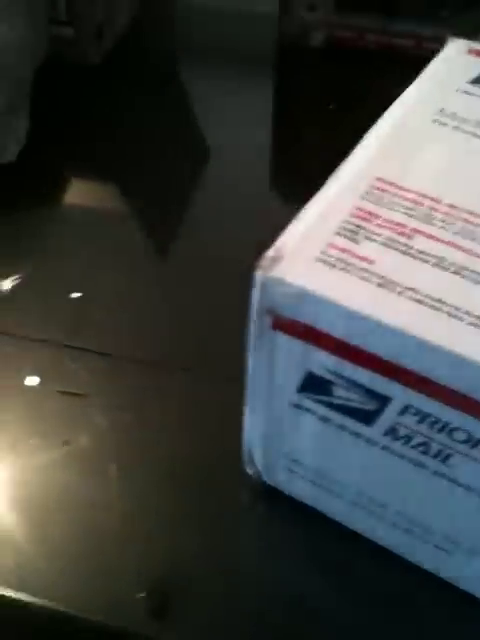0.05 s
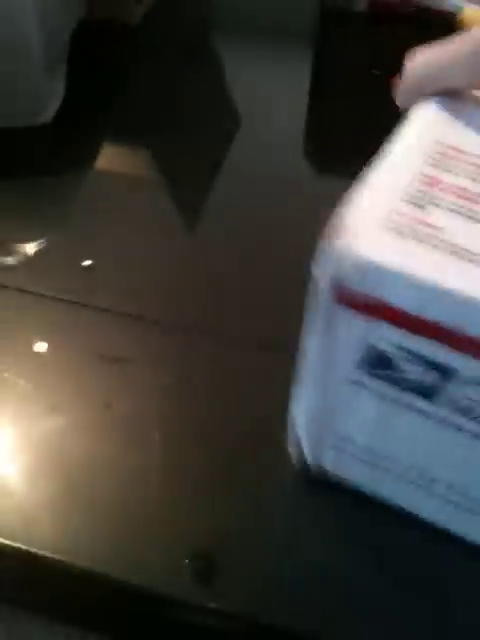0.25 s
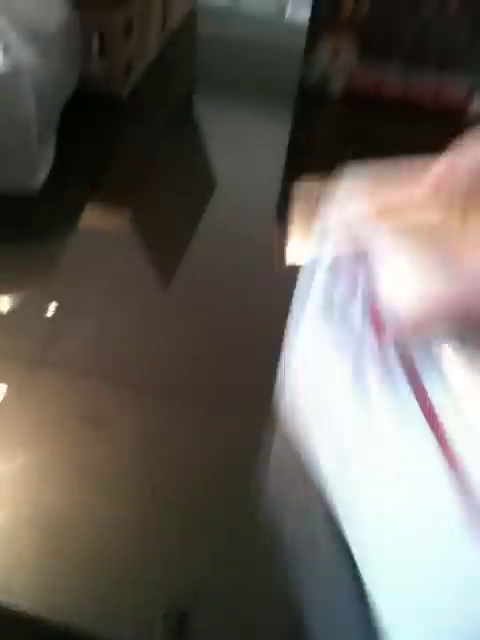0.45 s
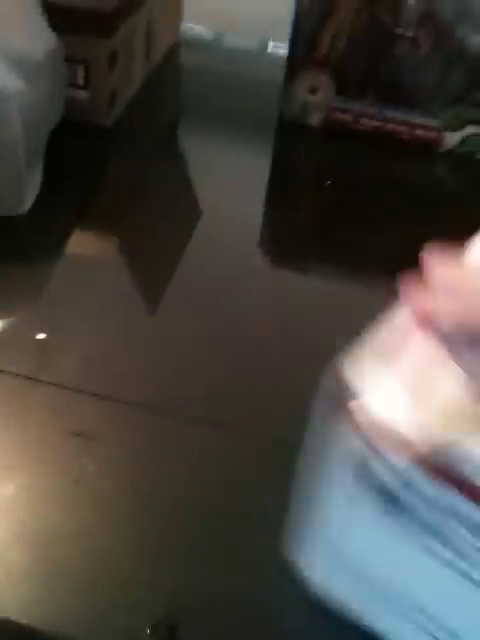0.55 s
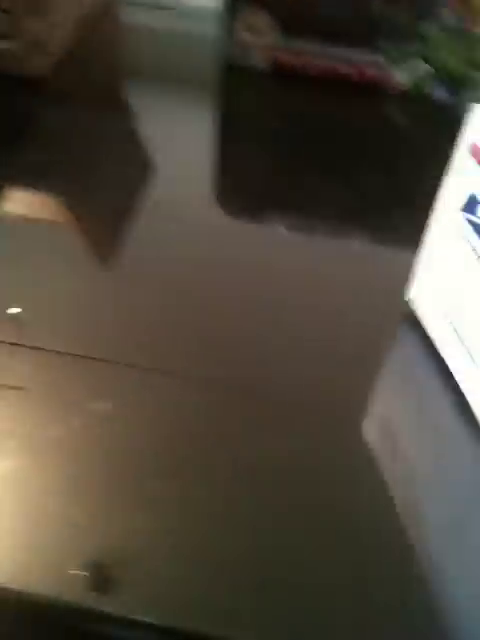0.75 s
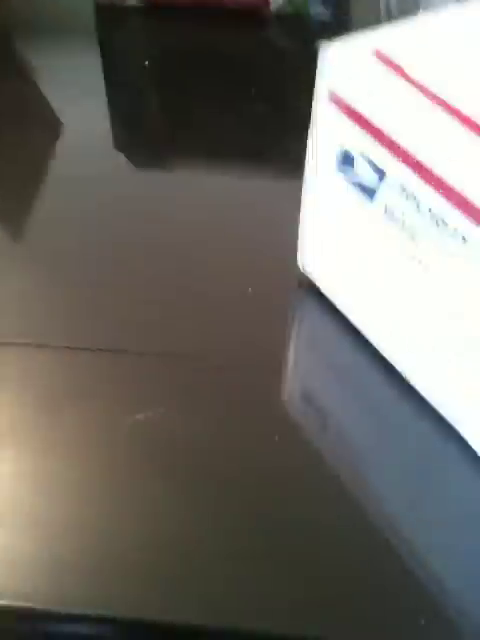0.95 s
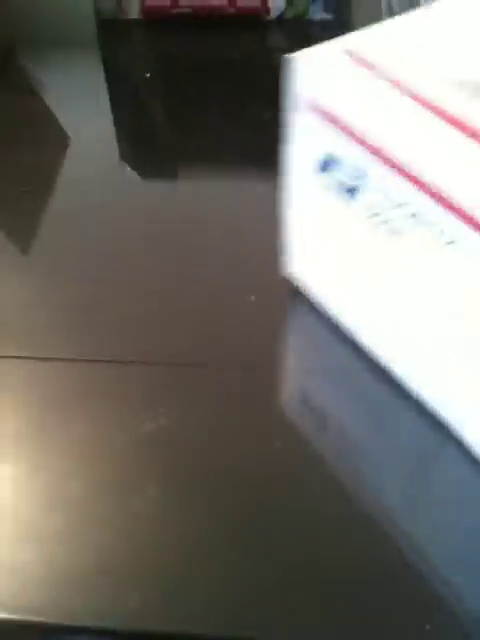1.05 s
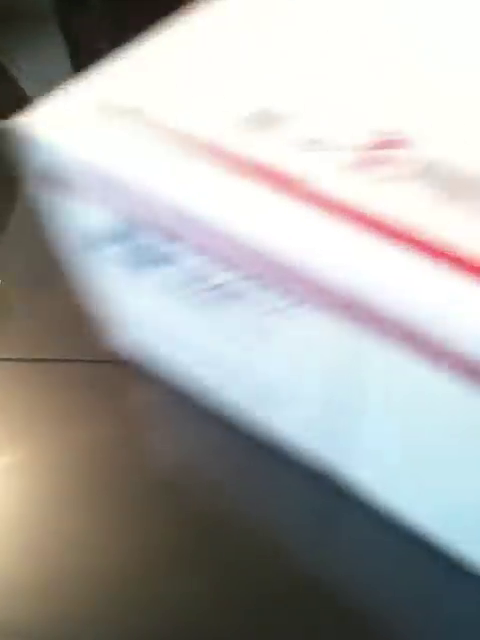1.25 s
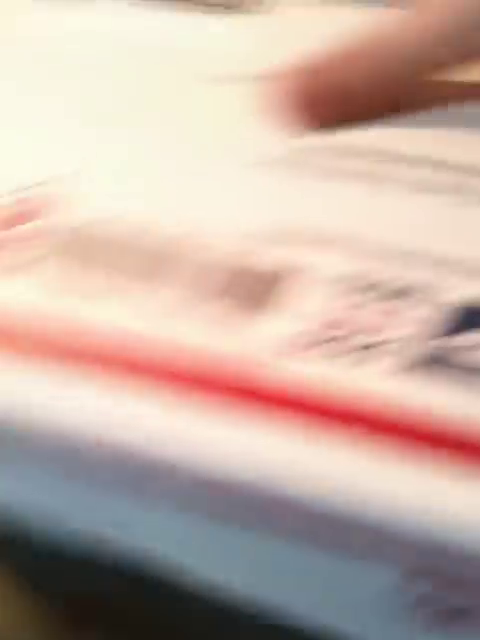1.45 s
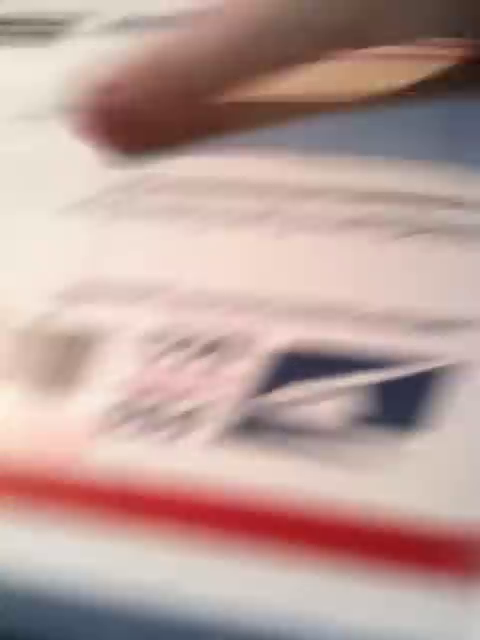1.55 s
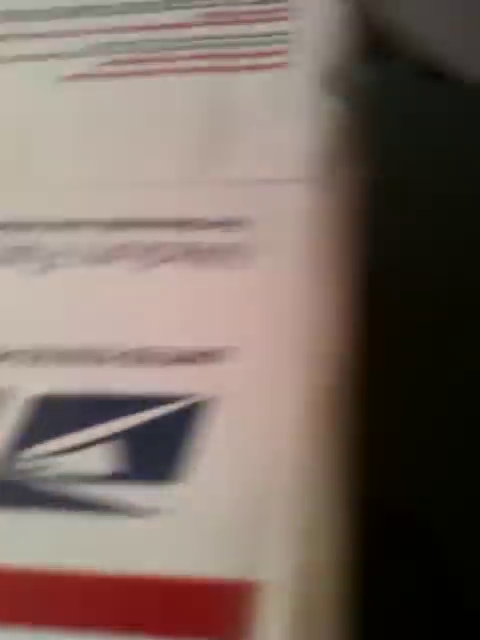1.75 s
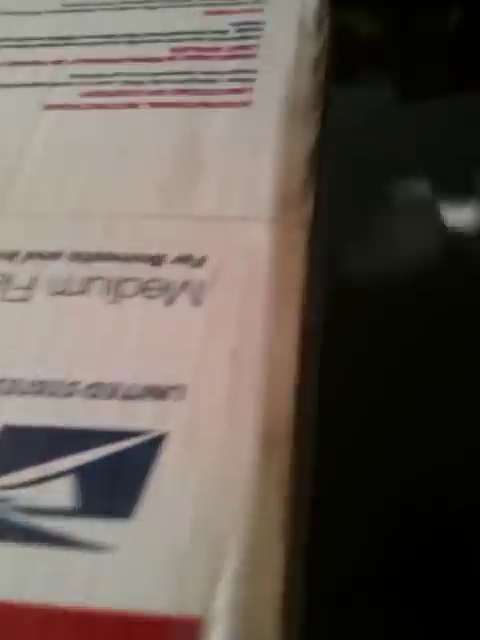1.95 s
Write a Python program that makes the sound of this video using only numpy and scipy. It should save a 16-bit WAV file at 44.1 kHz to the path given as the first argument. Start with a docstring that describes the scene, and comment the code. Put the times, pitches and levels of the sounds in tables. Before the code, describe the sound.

Close, thin-sounding indoor pickup of a cardboard box turned on a table: a brief drag, a hollow clacking knock, crackly finger ticks and sliding, a second double knock, near quiet, then faint crisp cutting scrapes.

```python
"""Cardboard box on a table

A cardboard box is tipped and turned on a hard table in a small room, close to the microphone.
Its edges knock down hollowly: decaying panel modes under crunches of clicks for the contact.
Hands slide on the card as grainy filtered noise and tick on it as clustered fibre snaps.
Near the end a thin blade catches in it with short sharp scrapes, over a faint steady hiss."""
import sys
import numpy as np
from scipy import signal
from scipy.io import wavfile
from scipy.ndimage import uniform_filter1d

SR = 44100
rng = np.random.default_rng(int(sys.argv[2]) if len(sys.argv) > 2 else 0)


def generate_wav(sig):
    """Save sig (samples, or channels by samples) to the path in sys.argv[1] as 16-bit PCM at SR."""
    pcm = np.round(np.clip(np.atleast_2d(sig).T, -1, 1) * 32767).astype(np.int16)
    wavfile.write(sys.argv[1], SR, pcm)


N = 88200  # two seconds, in samples

# Levels in the tables are before the trims in scene(); colours are spectra per Hz of bandwidth.
# Steady room noise: (frequency [Hz], level [dB])
FLOOR_COLOUR = [(25, -25), (80, -17.5), (120, -7.5), (170, -3), (260, 0), (420, -2.5), (520, -9.5),
                (820, -9.5), (1160, -15), (1850, -9), (2900, -17), (3600, -14.5), (8000, -15), (16000, -22)]
# Box dragging on the table before it is tipped: (time [s], level [dB])
DRAG_LEVEL = [(0, -65.5), (.06, -65.5), (.16, -68.5), (.20, -70), (.23, -93)]
# Colour of the drag: (frequency [Hz], level [dB])
DRAG_COLOUR = [(100, -27), (550, -11), (790, 9), (1100, -12), (1600, 1), (2300, -14), (3500, -15),
               (4350, 5), (5200, -13), (7500, -13), (16000, -25)]
# Card sliding under the hands: (time [s], hiss level [dB], low rub level [dB])
SLIDE_LEVELS = [(0, -68, -62), (.07, -66, -70), (.17, -66.5, -72), (.21, -71, -67), (.40, -68, -67),
                (.54, -90, -78), (0.629, -62, -63), (.675, -67.5, -55.5), (.72, -65.5, -67),
                (.77, -63, -64.5), (.825, -62, -71.5), (0.848, -76, -73), (0.988, -75, -80),
                (1.03, -64, -70), (1.07, -80, -96), (1.2, -75, -63), (1.33, -74.5, -77), (1.58, -71.5, -74),
                (1.63, -72, -74.5), (1.676, -64, -62), (1.74, -80, -87), (2, -70, -97)]
# Colours of the slide's hiss and rub: (frequency [Hz], level [dB])
HISS_COLOUR = [(100, -12), (1500, -16.5), (2800, -3), (4300, -3), (5600, -3), (7500, -1.5), (10000, -4),
               (16000, -9)]
RUB_COLOUR = [(30, -41), (100, -17), (170, 3.5), (400, 0.5), (600, -7), (1050, -3), (1300, -12),
              (1700, -6.5), (2600, -23), (8000, -34.5)]
# Box meets table: (time [s], hollow thud [dB], dull bump [dB], edge clack [dB],
#                   surface crack [dB], crack t60 [s], favoured frequency [Hz])
KNOCKS = [(0.002, -57, -42, -51, -54, 0.021, 755), (0.188, -44.5, -54, -63, -63, 0.015, 131),
          (0.2315, -18, -13, -21.5, -19, 0.015, 420), (0.238, -23, -30.5, -35, -22, 0.018, 155),
          (0.250, -34, -31, -46.5, -31.5, 0.0088, 415), (0.262, -27.5, -27, -30, -23.5, 0.02, 150),
          (0.305, -35.5, -47, -51, -45, 0.024, 447), (0.5665, -32.5, -31.5, -40.5, -40, 0.041, 378),
          (0.606, -49, -46, -51, -49, 0.023, 402), (0.675, -50, -43, -49, -59, .03, 1050),
          (0.893, -50.5, -53.5, -56.5, -66, 0.036, 364), (1.063, -67, -45, -52, -73, .015, 850),
          (1.074, -24.5, -31.5, -44, -62, .02, 280), (1.0853, -21.5, -29, -18.5, -20, 0.053, 318),
          (1.088, -21, -29.5, -39, -24.5, 0.043, 333), (1.101, -29, -43.5, -35, -29.5, 0.024, 380),
          (1.129, -29.5, -35, -46, -44, 0.037, 304), (1.189, -35, -44, -49, -40, .03, 404),
          (1.595, -47, -54.5, -59, -68, 0.011, 320), (1.607, -50.5, -51.5, -60, -70, 0.026, 309),
          (1.674, -50.5, -43.5, -48, -65, .02, 282), (1.785, -61, -55, -65, -68, .02, 890),
          (1.803, -51.5, -55, -71, -73, .02, 261)]
# Modes of the box panels: (frequency [Hz], relative level [dB], t60 [s])
PANEL_MODES = [(81, -21, 0.16), (122, -7.5, 0.12), (157.3, -6, 0.11), (212, -6.5, 0.19), (251, -5, 0.087),
               (326, 0.5, 0.055), (389, -1, 0.039), (415.9, -11.5, 0.24), (460, -3.5, 0.064),
               (568, -10.5, 0.045), (662, -4.5, 0.024), (753, -14.5, 0.043), (972, -15, 0.12)]
# Colours of the contact with the table: (frequency [Hz], level [dB])
BUMP_COLOUR = [(30, -39), (90, -13.5), (160, -4.5), (300, 2), (550, -0.5), (950, -4.5), (1300, -9.5),
               (2500, -42.5), (8000, -49)]
CLACK_COLOUR = [(100, -31), (700, 0), (1150, -3), (1650, 3), (2100, -3.5), (2700, -14.5), (5000, -18.5),
                (16000, -42)]
CRACK_COLOUR = [(100, 17), (1000, -19), (2900, -9), (4400, -2.5), (5500, -6.5), (7400, -2.5), (9000, -5),
                (11500, -17), (14000, -10), (16000, -42)]
# Ticks of fingers and card:
# (time [s], level [dB], t60 [s], tilt [dB per octave], resonance [Hz], resonance boost [dB])
TICKS = [(0.089, -53, 0.014, -7, 4670, 13), (0.1072, -34.5, 0.024, 0.5, 2100, 18),
         (0.1115, -33, 0.037, 1.5, 4500, 9.5), (0.209, -40.5, .03, 3, 6200, 24),
         (0.216, -42.5, 0.021, 7, 3580, -3.5), (0.258, -28, .02, 4, 4400, 13),
         (0.277, -23.5, 0.064, 2, 7460, 9), (0.287, -36, 0.064, 4, 4200, -3),
         (0.333, -43.5, .02, 0, 4860, 8), (0.408, -57, 0.025, 2, 6300, 8),
         (0.430, -41.5, 0.021, -1, 6200, 6.5), (0.506, -43.5, 0.044, 0.5, 6800, 4),
         (0.513, -50.5, 0.012, 4, 3300, 2), (0.5315, -40, 0.0026, 0, 6700, 15),
         (0.571, -36, .03, 1, 7500, 5.5), (0.585, -45, 0.014, 4, 7000, 7),
         (0.609, -40, 0.029, 3.5, 6300, 10), (0.618, -46, 0.018, 9, 7500, 2),
         (0.6525, -39, 0.011, 1, 7200, 7), (0.659, -42.5, 0.039, 0, 3500, 9),
         (0.776, -52, .02, 4, 4300, 21), (0.9235, -46, 0.015, -4, 3800, 1),
         (0.9265, -35.5, 0.024, -1, 3370, 9.5), (0.966, -45, 0.024, 2.5, 4060, 5.5),
         (1.014, -49.5, 0.021, 0, 4200, 11), (1.022, -43.5, 0.022, -5, 4280, 12),
         (1.149, -37.5, 0.021, -10, 4270, 5), (1.1805, -35.5, .07, -0.5, 4200, 0)]
# Colour of the ticks: (frequency [Hz], level [dB])
TICK_COLOUR = [(100, -28), (1000, -20), (2500, -11), (4300, -1), (5500, -6), (7200, -4), (9000, -8.5),
               (12000, -16), (16000, -25)]
# Catches of the blade:
# (time [s], level [dB], t60 [s], tilt [dB per octave], resonance [Hz], resonance boost [dB])
SCRAPES = [(1.792, -45.5, 0.018, 2.5, 5600, 2), (1.8195, -33, 0.033, -4, 2440, 5.5),
           (1.830, -41.5, 0.037, 5, 6940, 7), (1.8548, -38.5, 0.027, 3, 4600, 12),
           (1.863, -42, 0.024, 2, 5400, 7), (1.9283, -35, 0.064, 3, 3950, 10.5),
           (1.954, -39, 0.028, 0, 5400, 2), (1.9622, -35, 0.035, -0.5, 4370, 14.5),
           (1.968, -35.5, 0.032, 1.5, 7700, 7), (1.9727, -40.5, 0.035, 1, 5170, 3)]
# Colour of the blade: (frequency [Hz], level [dB])
BLADE_COLOUR = [(100, -45), (1200, -22), (2200, -8), (3300, -7), (4200, -6), (5600, -1.5), (7300, -2),
                (8500, -11.5), (9300, -3.5), (10700, -14), (12000, -12.5), (13800, -13), (14800, -43),
                (16000, -34)]
# Decay of the room tail: (frequency [Hz], t60 [s])
ROOM_T60 = [(100, 0.39), (400, 0.38), (1500, 0.4257), (6000, .3), (15000, 0.18)]
# Colour of the room tail: (frequency [Hz], level [dB])
ROOM_LEVEL = [(60, -18.5), (200, -10), (400, -9.5), (800, -11.5), (1700, -9), (4000, -6), (8000, -7),
              (15000, 0)]
# Reflections from nearby surfaces: (delay [s], gain [share of the direct sound before wet_db])
ECHOES = [(.0047, 0.38), (0.0109, 0.12), (0.0151, 0.1)]

FLOOR_DB = -69.5
FLICKER_DB, GRAIN_DB = 2.5, 2.5  # friction: rms of the slow flicker, mean lift of single grains
FIBRES_PER_S, FIBRE_SPREAD_DB = 7000, 1  # mean click rate, scale of their random lift
SNAP = 1.98  # first click of a crunch; the others swell quickly from nothing towards about 1, then die
RISE_SHARE = 0.031  # rise time constant of a crunch as a share of its t60
RING_OCTAVES = 0.15  # half-width of the resonance of the struck patch of card
FAVOUR_DB, FAVOUR_OCTAVES = 9.5, 0.18  # the place of a blow favours some panel modes
BUMP_FAVOUR_DB = 5
THUD_RISE_S, BUMP_T60_S, CLACK_T60_S = 0.003, 0.024, 0.016
ROOM_BUILD_S = 0.01
LOW_CUT_HZ, EDGE_HZ = 128, 15900


def amp(db):
    """Decibels to gain."""
    return 10 ** (np.asarray(db) / 20)


def unit(x):
    """Scales to rms 1."""
    return x / np.sqrt(np.mean(x ** 2) + 1e-20)


def blow(x):
    """Scales to the energy of one millisecond at rms 1."""
    return x / np.sqrt(np.sum(x ** 2) * 1000 / SR + 1e-20)


def decay(t, t60):
    """Exponential fade that loses 60 dB in t60 seconds."""
    return np.exp(-np.log(1000) * t / t60)


def bell(hz, centre_hz, octaves):
    """Resonance curve of height 1 on a log-frequency axis."""
    return 1 / (1 + (np.log2(hz / centre_hz) / octaves) ** 2)


def read(points, hz):
    """Reads a spectrum on a log-frequency axis."""
    f, value = np.transpose(points)
    return np.interp(np.log(hz + 1), np.log(f), value)


def add(mix, s, sound):
    """Mixes a sound in at a time."""
    part = mix[max(round(s * SR), 0):][:len(sound)]
    part += sound[:len(part)]


def causal(gain):
    """Spectrum of the causal filter that has this gain (given over the full circle)."""
    return np.exp(np.conj(signal.hilbert(np.log(gain))))


def smoothed(z, size):
    """Rms magnitude of a spectrum over a sliding window of bins."""
    power = uniform_filter1d(abs(z) ** 2, size=size, mode="wrap")
    return np.sqrt(abs(power) + 1e-12)


def colour(x, points, tilt_db=0, ring_hz=1000, ring_db=0, size=2048):
    """Causal filter with a given spectrum, a treble tilt and one resonance."""
    hz = abs(np.fft.fftfreq(size, 1 / SR))
    # The tilt pivots at 5 kHz and stays level below 1.5 kHz.
    db = read(points, hz) + tilt_db * np.log2(np.maximum(hz, 1500) / 5000)
    db = db + ring_db * bell(hz + 1, ring_hz, RING_OCTAVES)
    response = np.fft.ifft(causal(amp(db))).real[:size // 2]
    return signal.fftconvolve(x, response)[:len(x)]


def grainy(shape):
    """Friction noise: white noise whose single samples stand out at random."""
    return rng.standard_normal(shape) * amp(GRAIN_DB * rng.exponential(1, shape))


def crunch(t60, clump_db=0, size=120, count=4096):
    """A snap and a dying cluster of fibre clicks in clumps; its spectrum is evened over size bins."""
    t, t60 = np.arange(count) / SR, max(t60, .002)
    signs = rng.choice([-1., 1.], count)
    strength = amp(FIBRE_SPREAD_DB * np.minimum(rng.exponential(1, count), 3))
    clicks = signs * strength * (rng.random(count) < FIBRES_PER_S / SR)
    clumps = unit(uniform_filter1d(rng.standard_normal(count), size=50))
    clicks *= amp(clump_db * clumps) * (1 - np.exp(-t / (RISE_SHARE * t60)))
    clicks[0] = SNAP
    z = np.fft.fft(clicks * decay(t, t60), 2 * count)
    return np.fft.ifft(z / causal(smoothed(z, size))).real[:count]


def room_noise():
    """A faint steady hiss: coloured noise at a constant level."""
    return amp(FLOOR_DB) * unit(colour(rng.standard_normal(N), FLOOR_COLOUR))


def drag():
    """Card dragged over the table top rasps in a few narrow resonances."""
    level_db = np.interp(np.arange(N) / SR, *np.transpose(DRAG_LEVEL))
    return unit(colour(grainy(N), DRAG_COLOUR)) * amp(level_db)


def sliding():
    """Grainy, uneven friction: a hiss from the paper and a low rub from the panels."""
    s, hiss_db, rub_db = np.transpose(SLIDE_LEVELS)
    t = np.arange(N) / SR
    slow = uniform_filter1d(rng.standard_normal(N), size=300)
    slow = uniform_filter1d(slow, size=150)
    flicker = amp(FLICKER_DB * unit(slow))  # shared by hiss and rub
    grains = grainy((2, N)) * flicker
    hiss = unit(colour(grains[0], HISS_COLOUR)) * amp(np.interp(t, s, hiss_db))
    rub = unit(colour(grains[1], RUB_COLOUR)) * amp(np.interp(t, s, rub_db))
    return hiss + rub


def panel_thud(main_hz):
    """The hollow note of a blow: decaying panel modes, each lifted the nearer it is to main_hz."""
    t = np.arange(SR // 2) / SR
    panels = np.zeros(len(t))
    for k, (hz, db, t60) in enumerate(PANEL_MODES):
        gain = amp(db + FAVOUR_DB * bell(hz, main_hz, FAVOUR_OCTAVES))
        # Neighbouring modes start in opposite directions.
        panels += (-1) ** k * gain * decay(t, t60) * np.sin(2 * np.pi * hz * t)
    return blow(panels * (1 - np.exp(-t / THUD_RISE_S)))


def knocks():
    """Each landing rings the panels; its contact bumps the table, clacks the edge, cracks the surface."""
    body, contact = np.zeros(N), np.zeros(N)
    for s, thud_db, bump_db, clack_db, crack_db, crack_t60, main_hz in KNOCKS:
        bump = colour(crunch(BUMP_T60_S, size=40), BUMP_COLOUR, 0, main_hz, BUMP_FAVOUR_DB)
        clack = colour(crunch(CLACK_T60_S, size=60), CLACK_COLOUR)
        crack = colour(crunch(crack_t60, clump_db=2, size=240), CRACK_COLOUR)
        add(body, s, amp(thud_db) * panel_thud(main_hz))
        add(contact, s, amp(bump_db) * blow(bump))
        add(contact, s, amp(clack_db) * blow(clack))
        add(contact, s, amp(crack_db) * blow(crack))
    return body, contact


def catches(rows, spectrum, clump_db):
    """Short clumped runs of snapping fibres, each ringing its own patch of card."""
    out = np.zeros(N)
    for s, db, t60, tilt_db, ring_hz, ring_db in rows:
        snaps = crunch(t60, clump_db, size=240)
        add(out, s, amp(db) * blow(colour(snaps, spectrum, tilt_db, ring_hz, ring_db)))
    return out


def room(x, wet_db, size=32768):
    """A few near echoes and a diffuse tail that dies faster in the treble, free of strong resonances."""
    hz, t, z = signal.stft(rng.standard_normal(size), SR, nperseg=256)
    t60 = read(ROOM_T60, hz)[:, None]
    even_energy = np.sqrt(2 * np.log(1000) / (t60 * SR))  # long decays get no more energy than short
    z = z * decay(t, t60) * even_energy * amp(read(ROOM_LEVEL, hz))[:, None]
    build_up = np.minimum(np.arange(size) / SR / ROOM_BUILD_S, 1)
    tail = signal.istft(z, SR, nperseg=256)[1][:size] * build_up
    for delay, share in ECHOES:
        add(tail, delay, np.array([share]))
    path = 1 + amp(wet_db) * np.fft.fft(tail)  # direct sound plus room
    # Narrow peaks and dips are evened out towards the broad spectrum.
    path *= causal(smoothed(path, size=400) / smoothed(path, size=36))
    return signal.fftconvolve(x, np.fft.ifft(path).real)[:N]


def scene():
    """Box, hands and blade in the room, with dry friction and a faint steady hiss."""
    floor = room_noise()
    body, contact = knocks()
    box = amp(-5.5) * room(body, wet_db=-1.0) + amp(-4.5) * room(contact, wet_db=0.0)
    ticks = amp(-6) * room(catches(TICKS, TICK_COLOUR, clump_db=2.5), wet_db=-4.0)
    blade = amp(-5) * room(catches(SCRAPES, BLADE_COLOUR, clump_db=3.5), wet_db=-4.5)
    return (box + ticks + blade + sliding() + drag() + floor)[None]


def record(dry):
    """A small microphone's weak bass and the recorder's band limit."""
    low_cut = signal.butter(2, LOW_CUT_HZ, "highpass", fs=SR, output="sos")
    thin = signal.sosfilt(low_cut, dry)
    band_limit = signal.firwin(511, EDGE_HZ, window=("kaiser", 9), fs=SR)
    return signal.oaconvolve(thin, band_limit[None], "same")


dry = scene()
out = record(dry)
generate_wav(out)
```